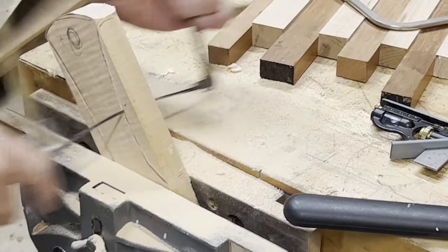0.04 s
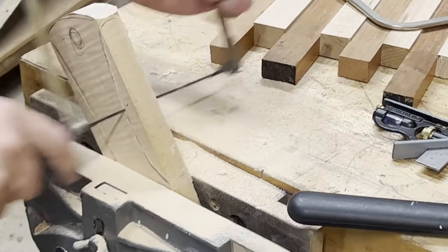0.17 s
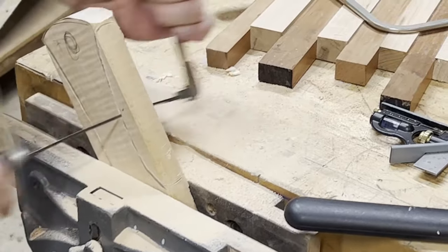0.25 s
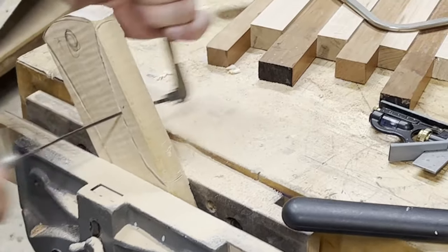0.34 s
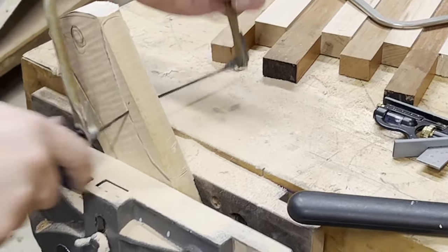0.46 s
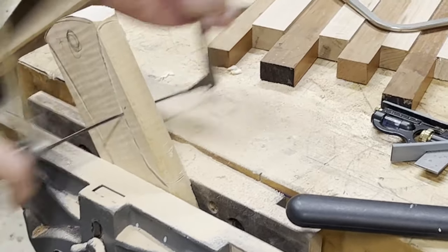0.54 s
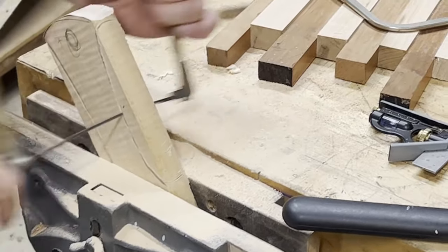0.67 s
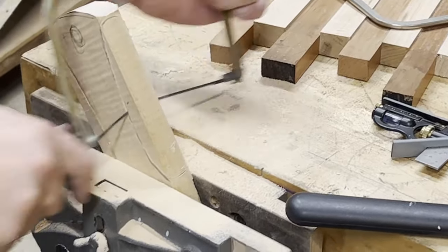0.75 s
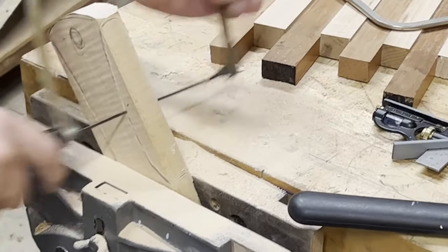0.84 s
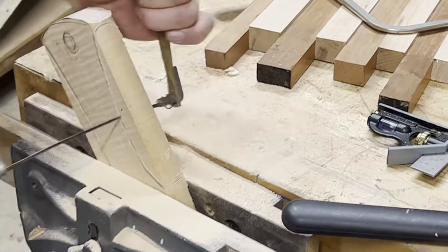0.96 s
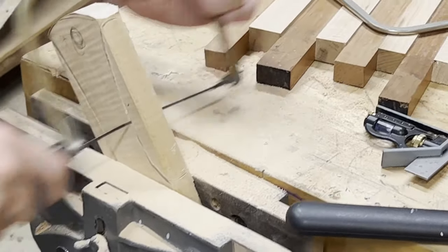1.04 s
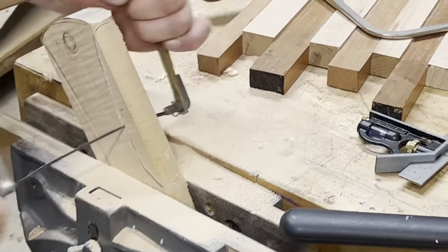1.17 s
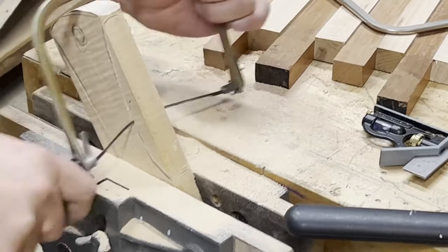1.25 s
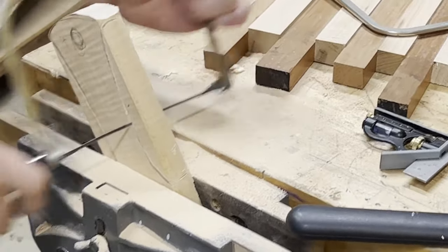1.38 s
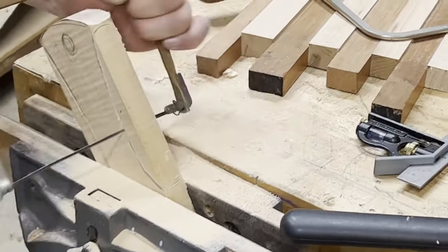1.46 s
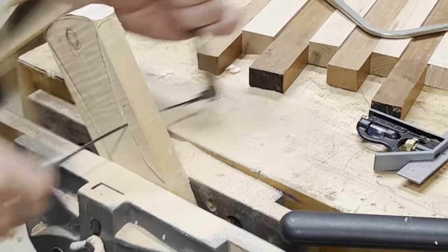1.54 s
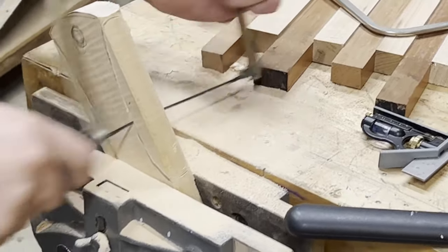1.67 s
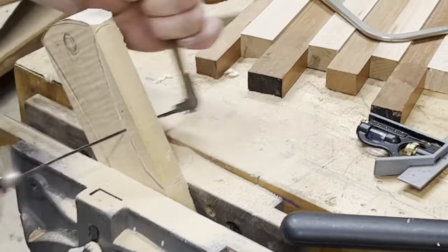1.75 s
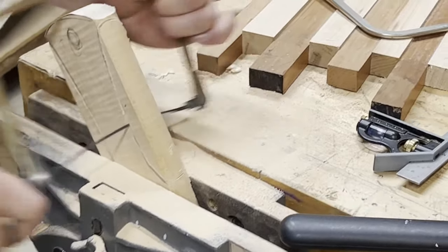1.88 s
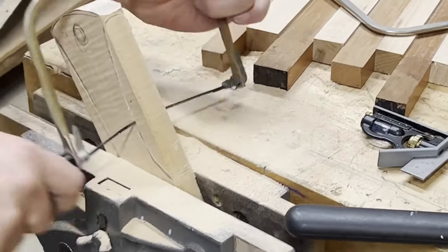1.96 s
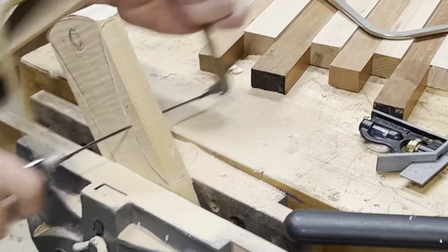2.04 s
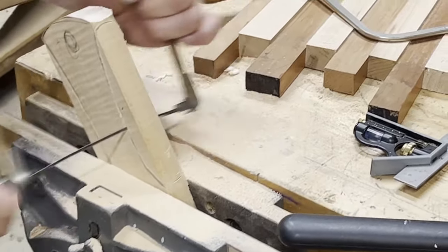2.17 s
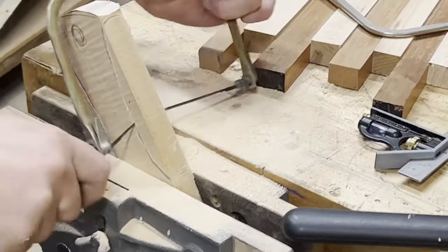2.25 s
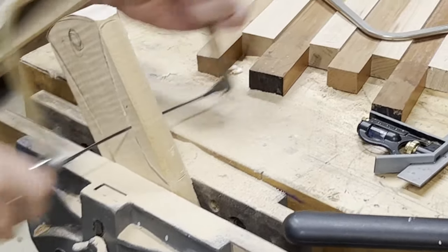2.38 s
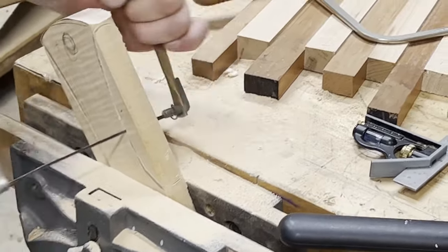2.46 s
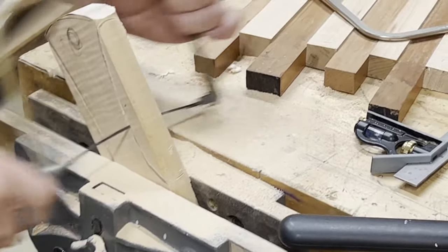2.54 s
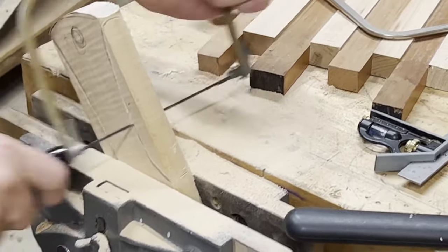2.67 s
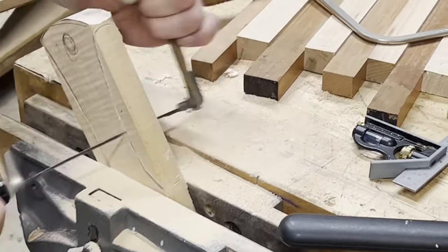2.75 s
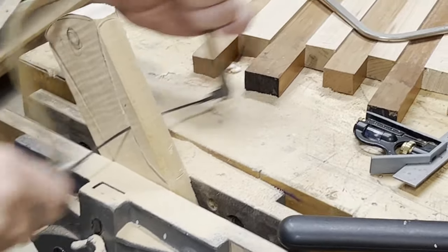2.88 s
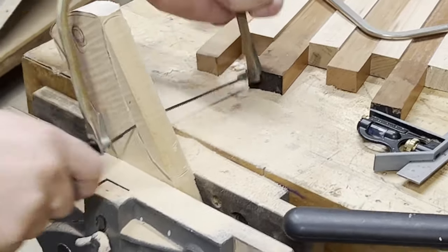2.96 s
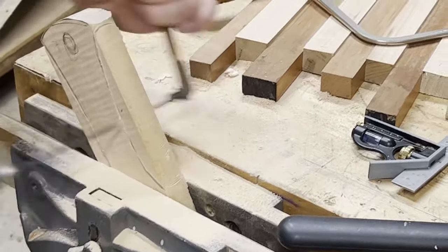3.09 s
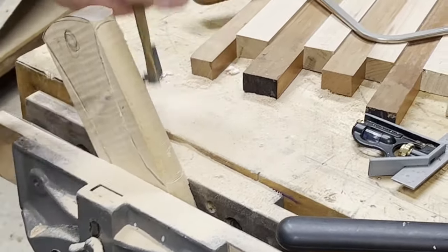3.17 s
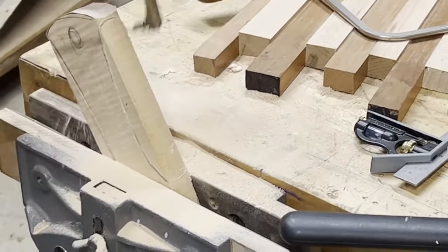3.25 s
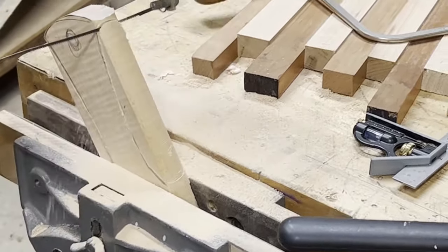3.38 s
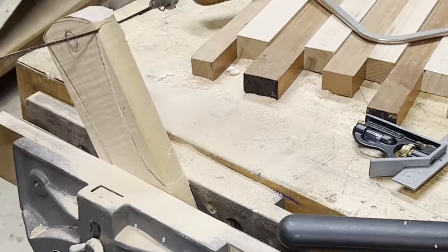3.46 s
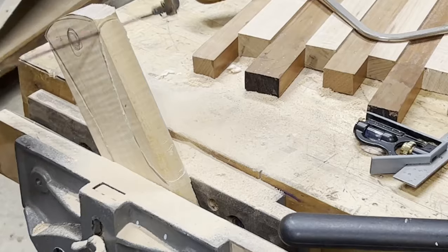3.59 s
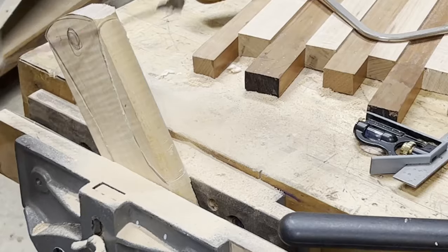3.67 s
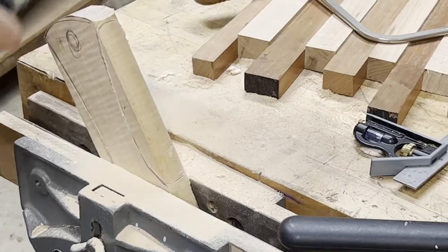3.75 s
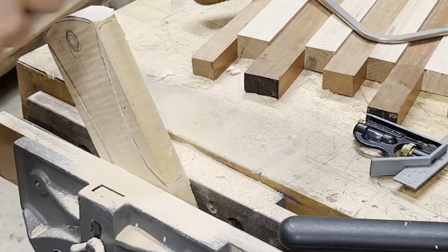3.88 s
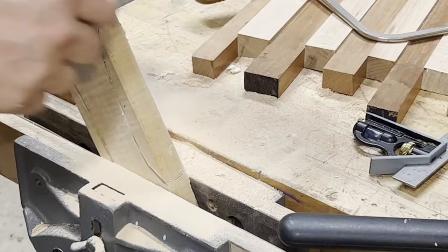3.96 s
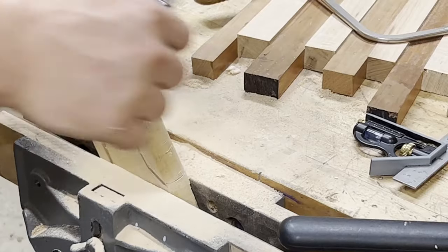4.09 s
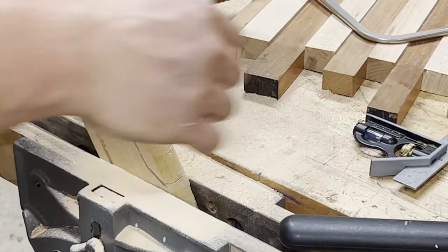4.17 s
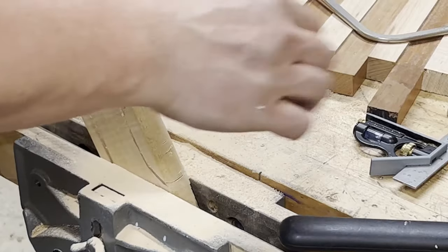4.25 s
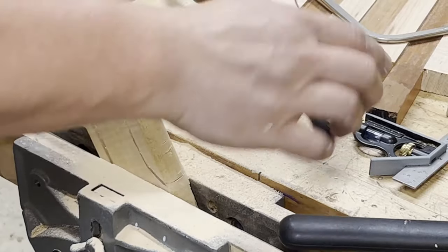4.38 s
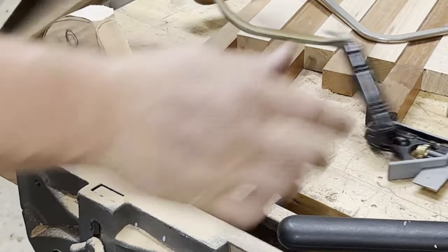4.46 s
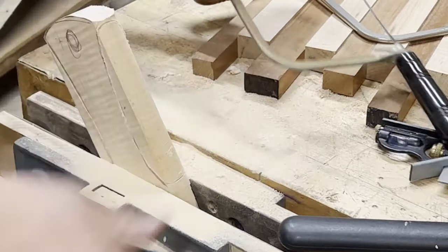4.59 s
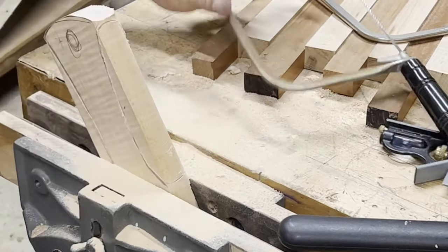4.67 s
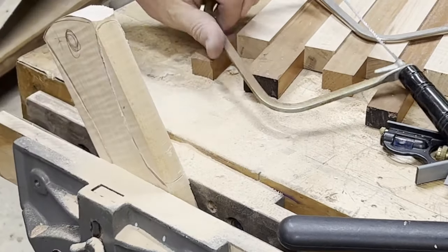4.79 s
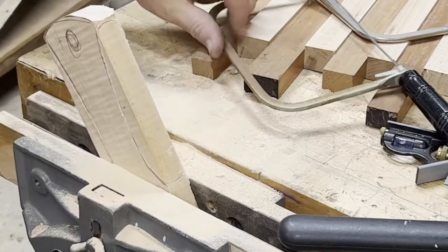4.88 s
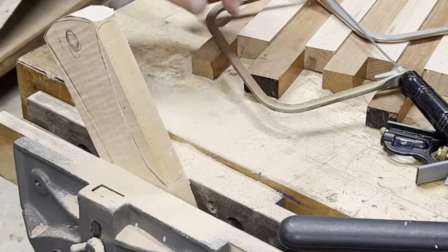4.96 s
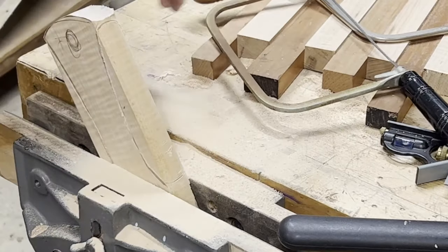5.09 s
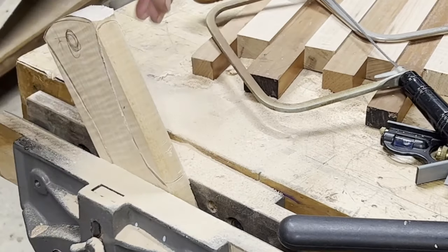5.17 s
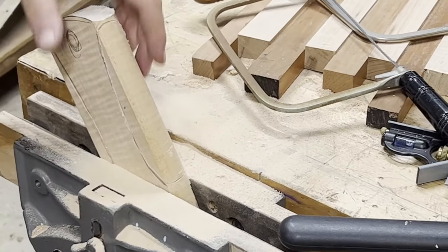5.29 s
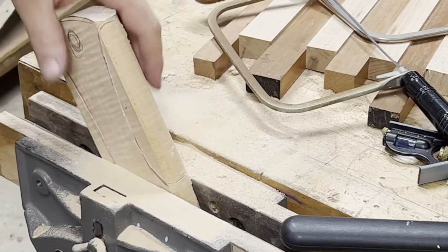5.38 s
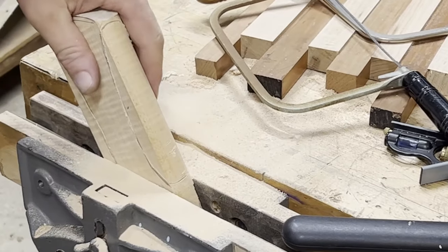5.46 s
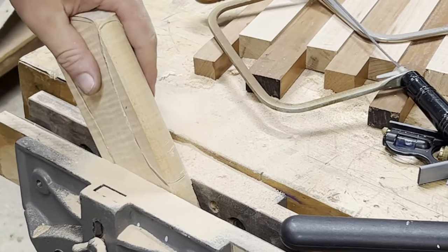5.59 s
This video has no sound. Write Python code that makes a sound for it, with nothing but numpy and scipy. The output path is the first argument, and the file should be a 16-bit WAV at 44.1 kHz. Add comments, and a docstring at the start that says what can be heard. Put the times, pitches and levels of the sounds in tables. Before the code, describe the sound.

A coping saw rasps through clamped hardwood in fast strokes, squeaking faintly, then clicks free, clatters onto the bench and slides to rest.

```python
"""Small workshop, one microphone: a coping saw cuts a curve through a hardwood board clamped in a vice.
Three strokes there and back a second: the teeth rasp, the board and the taut blade ring and the frame
shudders, all driven by noise shaped to the strokes; the blade squeaks, a thin sine, as it turns round.
The saw clicks free, clatters onto the bench (cracks of noise with ringing modes) and slides to rest in tiny
slips; a hand brushes and taps the board. Still air and a short diffuse echo surround it all."""
import sys
import numpy as np
from scipy import signal
from scipy.fft import rfft, irfft
from scipy.io import wavfile
from scipy.ndimage import uniform_filter1d

SR = 44100
rng = np.random.default_rng(int(sys.argv[2]) if len(sys.argv) > 2 else 0)


def put_to_file(sound):
    """Save the sound as 16-bit audio at rate SR, in the file named by the first command-line argument."""
    columns = np.atleast_2d(sound).T  # one column per channel
    safe = np.clip(columns, -1, 1)
    whole_steps = np.round(safe * 32767)
    wavfile.write(sys.argv[1], SR, whole_steps.astype(np.int16))


N = 248267
T = np.arange(N) / SR  # seconds

# Still air of the workshop. Each row: frequency in Hz, relative level in dB.
AIR_COLOUR = [(20, -22.5), (45, -2), (80, 3), (160, -6), (380, -9), (800, -16.5), (1700, -25.5),
              (3500, -32), (8000, -35), (16000, -38)]
AIR_DB = -60

# Cutting strokes. Each row: start in seconds, length in seconds, then the drive in dB of the rasp of the teeth,
# the board, the blade ring and the frame shudder.
CUTS = [(0.023, 0.094, -39.0, -34.5, -46, -32.0), (0.329, 0.13, -41.0, -38.5, -46.5, -32.5),
        (0.66, 0.11, -39.0, -37, -46.5, -34.5), (0.971, 0.16, -42.5, -36.0, -44, -37),
        (1.169, 0.12, -38.0, -32, -38.5, -33.5), (1.483, 0.13, -41.0, -38, -37.0, -36.5),
        (1.826, 0.13, -40.5, -37, -36.5, -38), (2.149, 0.136, -40.0, -37.5, -37.5, -37.5),
        (2.487, 0.12, -37.0, -38.5, -36.5, -40), (2.823, 0.11, -39.5, -37, -35.5, -43),
        (3.146, 0.19, -47.5, -44.5, -48.0, -41.5)]
# Light return strokes. Each row: start in seconds, length in seconds, drive in dB, frame drive in dB.
RETURNS = [(-0.048, 0.084, -56.5, -49), (0.167, 0.168, -51.5, -37.5), (0.499, 0.176, -51.5, -39.5),
           (0.819, 0.153, -51.0, -42.5), (1.349, 0.144, -50.5, -43), (1.656, 0.175, -50.0, -43),
           (2.008, 0.139, -49.5, -45.0), (2.326, 0.152, -49.5, -43.5), (2.675, 0.155, -52.5, -43),
           (2.983, 0.214, -54.5, -44), (3.449, 0.1, -63.5, -60)]
# Rasp, board and blade on the way back, in dB relative to the drive of a return stroke.
RETURN_BALANCE_DB = (0, 7, -1)
# What the twist of the blade adds to these three, in dB.
RETURN_TWIST_DB = (0, 2, 6.5)
# How rasp, board, blade and frame answer a stroke. Each row: power of the speed, growth over the stroke in dB,
# lingering share in dB, its t60 in seconds.
RESPONSE = [(1.05, 6, -12, .5), (0.77, 8, -3.5, .41), (0.87, -0.5, -7, 0.37), (1.14, 2.5, -3, 0.47)]
# The teeth bite deep and stall, shaking blade, board and frame in turn. Each row: time in seconds, then the
# drive in dB of blade, board and frame.
BITES = [(0.729, -36.5, -30.5, -42), (1.245, -25.5, -25, -28.5), (1.9, -35.5, -38, -27.5),
         (2.568, -24, -20, -26), (2.866, -33, -32.5, -50)]
BITE_WIDTH_S, BITE_LAG_S = 0.011, 0.0099
# Just after top speed the teeth outrun the frame's resonance and its shudder dips. One row: place in the
# stroke from 0 to 1, width in seconds, depth in dB.
OUTRUN = (0.58, .012, -8)
FRAME_PUSH_DB = 4  # extra shudder at mid-stroke, as the teeth pass through that resonance
# The slack frame wobbles as the saw is backed out of the cut. One row: start in seconds, length in seconds,
# drive in dB.
BACKING_OUT = (3.29, 0.12, -41.5)
BEND_S, BEND_TAKES_S = 1.06, 0.028  # the blade twists into the bend

# Rasp of the teeth in the straight cut and in the bend. Each row: frequency in Hz, relative level in dB.
RASP_STRAIGHT = [(1800, -25.5), (2850, -1.5), (3370, -10), (4100, -4.5), (4740, -9), (5150, -13.5),
                 (5900, -5), (7830, -9), (9900, -19.5), (11000, -7), (13300, -20), (14700, -11),
                 (15600, -23), (16200, -58)]
RASP_BEND = [(1800, -30.5), (2800, -7.5), (3650, -5.5), (5150, -12), (5800, -12), (6430, 0), (7400, -13.5),
             (8500, -12), (9690, -15.5), (11700, -13), (12900, -16), (14500, -10), (15600, -15.5),
             (16200, -47.5)]
# Resonances of the saw frame, the clamped board and the blade, in the straight cut and in the bend.
# Each row: frequency in Hz, width of a single pass in Hz, relative level in dB.
BODY_STRAIGHT = [(305.3, 13, -2), (362, 55, -1), (430.6, 23, 2), (486.5, 66, -8), (624, 76, -1.5),
                 (697, 63, -6), (820, 83, -2.5), (858, 83, -6), (1049, 55, -1), (1143, 130, -5),
                 (1286, 130, -4.5), (1414, 28, -4), (1607, 230, -7.5), (1822, 140, -11), (2250, 130, -13.5),
                 (2423, 140, -17), (2905, 210, -15), (3674, 200, -14.5)]
BODY_BEND = [(290.5, 10, 4.5), (352, 82.5, 5), (438.8, 17, -5.5), (570.4, 23, -4), (739, 51, -3),
             (788, 80, 0), (894, 33, -0.5), (1030, 63, -2.5), (1143, 121, -6), (1340, 123, -6.5),
             (1480, 91, -6.5), (1620, 110, -14), (2090, 280, -14), (2333, 72, -1), (2478, 120, -2),
             (2600, 54, -9.5), (2780, 61, -9), (2940, 68, -12.5), (3234, 270, -19.5), (3624, 130, -16)]
# Rumble of the bench under the strokes. Each row: frequency in Hz, relative level in dB.
BENCH_COLOUR = [(30, -23), (55, -4.5), (100, 5.5), (135, -4.5), (158, 10.5), (185, 2), (225, -3), (270, 7),
                (400, -32)]

# The blade catches and jolts the board, hardest on the way back. Each row: time in seconds, peak in dB.
CATCHES = [(.04, -35), (.223, -22.5), (.555, -23), (.889, -23.5), (1.081, -27), (1.173, -29.5),
           (1.407, -21), (1.624, -27), (1.734, -24), (1.851, -27.5), (2.065, -20), (2.283, -29),
           (2.397, -21.5), (2.726, -22.5), (2.941, -30), (3.055, -22), (3.159, -28)]
# The board rattling in the vice. Each row: frequency in Hz, relative level in dB.
CATCH_COLOUR = [(70, -31.5), (160, 10), (250, -7), (350, -12.5), (470, -18), (580, 8), (670, -5), (810, 9),
                (1050, -7.5), (1300, -15.5), (1900, -10.5), (3000, -34), (6000, -36.5), (16000, -59)]

# The steel blade clicks in the cut and as it comes free. Each row: time in seconds, approximate peak in dB,
# treble gain in dB.
CLICKS = [(.04, -34, 10), (3.307, -30.5, -16), (3.457, -40.5, -8), (3.502, -37, -23), (3.517, -37.5, -21.5),
          (3.605, -22.5, -3.5), (3.675, -30, -3.5), (3.689, -15.5, -4), (3.7005, -10.5, 6.5),
          (3.884, -45, -2), (3.944, -50.5, -6), (4.235, -68, -8)]
# Crack of a click. Each row: frequency in Hz, relative level in dB.
CLICK_COLOUR = [(120, -56.5), (200, -8), (382, 6), (689, -23.5), (1390, -6.5), (1730, -20.5), (2250, 7),
                (2650, -9), (2960, -6), (7600, -8.5), (8970, -8.5), (12300, -11), (14500, -2), (16500, -31)]
# Ringing of the steel. Each row: frequency in Hz, relative level in dB, undamped t60 in seconds.
CLICK_MODES = [(356, 5, 0.25), (935, -3, 0.52), (1470, -7.5, 0.38), (2350, -4, 0.34), (2950, -1, 0.72),
               (3315, -3, 0.24), (4240, 3, 0.32), (4970, -11.5, 0.29), (6099, -8, 0.65), (7058, -23, 0.24),
               (8930, 1, 0.35), (10380, -29.5, 0.36), (10710, -11.5, 0.21), (10800, -21.5, 0.91),
               (11680, -5, 0.11), (12870, -34.5, 0.45), (13400, -22.5, 0.29), (14610, -20.5, 0.74),
               (14770, -12.5, 0.15), (15430, -23, 0.15)]
LONGEST_RING_S = .24  # the bench and the hand damp every struck mode to this t60 at most

# The blade squeaks at a turn. Each row: time in seconds, level in dB, seconds until it is let go.
SQUEAKS = [(.286, -47, .025), (.957, -56, .012), (1.469, -52, .008), (1.764, -51, .02), (2.125, -40, .025),
           (2.433, -46, .022), (2.806, -41, .02)]
SQUEAK_HZ = 11065

# Light knocks on wood. Each row: time in seconds, approximate peak in dB, treble gain in dB.
KNOCKS = [(3.503, -32, 2), (3.561, -37.5, -13), (3.606, -28.5, -21), (3.619, -27, -16), (3.708, -24, -7),
          (4.8228, -25.5, 22), (4.868, -24.5, 15), (4.878, -20.5, -14), (4.897, -19, 10), (4.918, -25, 24),
          (4.959, -24.5, 6), (4.992, -27.5, 15), (5.315, -37, 13), (5.395, -35, -45), (5.475, -43.5, 23)]
# Bench top, knocked or slid over. Each row: frequency in Hz, relative level in dB.
BENCH_TOP_COLOUR = [(47, -14.5), (80, -1), (208, -6), (277, 9.5), (386, -5), (657, 6.5), (1370, -3.5),
                    (1490, 1), (1860, -5.5), (4050, -20.5), (5400, -29), (8990, -33.5), (9610, -35),
                    (10700, -25.5), (16000, -45)]

# Single tones of the steel frame that sing out. Each row: time in seconds, frequency in Hz, peak in dB,
# t60 in seconds.
PINGS = [(3.606, 2280, -40, 0.14), (3.701, 9150, -36.5, 0.26), (3.985, 2280, -60, 0.095),
         (4.236, 2250, -54.5, 0.046), (4.245, 4750, -69, .1), (4.4, 1144, -26, .081),
         (4.489, 1597, -20.5, 0.055), (4.49, 6670, -26.5, 0.051), (4.534, 5030, -36, 0.041),
         (4.69, 4980, -49, 0.04)]

# The saw lands on the bench and bounces. Each row: time in seconds, approximate peak in dB, treble gain in dB.
BOUNCES = [(4.3988, -16, -4), (4.408, -14, 17.5), (4.412, -20, 4), (4.458, -15.5, 24), (4.481, -17.5, 5),
           (4.489, -18, 7), (4.534, -19, -3.5), (4.561, -24, -1), (4.626, -30.5, -26), (4.689, -33.5, -23)]
# Crack of a landing. Each row: frequency in Hz, relative level in dB.
BOUNCE_COLOUR = [(88, -31), (150, 4.5), (218, -27.5), (349, 1), (549, -9), (1050, 0), (1330, -3.5),
                 (1560, -5), (3630, -20.5), (5070, -20.5), (8290, -17), (9510, -28.5), (10900, -14),
                 (15600, -34), (16500, -44)]
# Ringing of the landed saw. Each row: frequency in Hz, relative level in dB, undamped t60 in seconds.
BOUNCE_MODES = [(1072, 19.5, 1.2), (1134, 10, 0.99), (1640, 5, 0.19), (4247, -27, 1.1), (4690, 6.5, 0.13),
                (5000, -10, 0.47), (5500, -14, 0.21), (6078, -17, 0.31), (6578, -8, 0.36),
                (7187, -17, 0.41), (7530, -9, 0.27), (8250, -18, 0.38), (9249, -21, 0.34),
                (10090, -21, 0.36), (10470, -16, 0.21), (11060, -8.5, 0.16), (11500, -18, 0.23),
                (12440, -22, 0.38), (13040, -19, 0.3), (13440, -22, 0.3)]

# The hand slips off the saw and takes hold of the board. Each row: start in seconds, length in seconds,
# level in dB.
BRUSHES = [(4.772, 0.066, -58.5), (5.011, .11, -55.5), (5.05, 0.28, -66.5), (5.476, 0.22, -67)]

SLIDE_S, SLIDE_DB = 4.82, -34  # the saw starts to skid over the bench
SLIDE_RISE_S, SLIDE_HOLD_S, SLIDE_T60_S = 0.053, 0.14, 0.41  # rise and hold both count from the start

TOP_HZ = 16300  # upper limit of the sound in Hz


def amp(db):
    """Decibels to gain."""
    return 10 ** (np.asarray(db) / 20)


def unit(x):
    """Scale to rms 1."""
    return x / np.sqrt(np.mean(x ** 2))


def fade(t, t60):
    """A decay of 60 dB in t60 seconds."""
    return np.exp(-np.log(1000) * t / t60)


def add(out, s, sound):
    """Mix a sound in at time s."""
    i = int(s * SR)
    out[i:i + len(sound)] += sound[:N - i]


def colour(x, points, size=4096):
    """Causal minimum-phase filter through (Hz, dB) points, made by folding the cepstrum."""
    hz, db = np.transpose(points)
    f = np.maximum(np.fft.rfftfreq(size, 1 / SR), 1)
    cepstrum = irfft(np.log(amp(np.interp(np.log(f), np.log(hz), db))))
    cepstrum[1:size // 2] *= 2
    cepstrum[size // 2 + 1:] = 0
    response = irfft(np.exp(rfft(cepstrum)))
    return signal.fftconvolve(x, response)[:len(x)]


def band(x, lo_hz, hi_hz, order=2):
    """Band-pass."""
    return signal.sosfilt(signal.butter(order, [lo_hz, hi_hz], "band", fs=SR, output="sos"), x)


def resonate(x, peaks):
    """Parallel resonances (Hz, width Hz, dB), each applied twice so that the valleys stay dark."""
    out = 0
    for hz, width, db in peaks:
        section = np.concatenate(signal.iirpeak(hz, hz / width, SR))
        out = out + amp(db) * signal.sosfilt([section] * 2, x)
    return out


def waver(rate):
    """Smooth chance with rms 1, taking about `rate` new values a second."""
    k = int(SR / rate)
    values = np.repeat(rng.standard_normal(N // 8), 8)
    steps = values[np.arange(N) // k * 8]
    return unit(uniform_filter1d(steps, k))


def grains(rate, spread_db):
    """Random tiny impacts of uneven size, `rate` a second on average."""
    happens = rng.random(N) < rate / SR
    sign = rng.choice([-1, 1], N)
    size = amp(spread_db * np.minimum(rng.exponential(size=N), 4))
    return unit(happens * sign * size)


def steady(x, size, give=0.39):
    """Even out swells slower than `size` samples and keep the fine grain."""
    swell = np.sqrt(abs(uniform_filter1d(x ** 2, size)))
    return unit(x / (swell + give * x.std()))


def spread(x, tail, db):
    """Convolve with a tail scaled to unit energy, at a level in dB."""
    return amp(db) * signal.fftconvolve(x, tail / np.sqrt(np.sum(tail ** 2)))[:N]


def scatter(x, share_db, t60):
    """Dense short ringing of steel and nearby surfaces, added to the sound."""
    t = T[:SR // 8]
    return x + spread(x, rng.standard_normal(len(t)) * fade(t, t60), share_db)


def glide(x, stretch):
    """Shift all resonances by a moving ratio, by reading the sound at a varying speed."""
    return np.interp(np.cumsum(stretch) / SR, T, x)


def arch(start, length, power=1, growth_db=0):
    """One sweep of the arm: speed rises and falls as half a sine while the pressure grows."""
    u = np.clip((T - start) / length, 0, 1)
    speed = np.maximum(np.sin(np.pi * u), 0)
    return speed ** power * amp(growth_db * (u - .5)) * (u > 0) * (u < 1)


def bell(s, width):
    """A smooth bump around time s."""
    return np.exp(-.5 * ((T - s) / width) ** 2)


def still_air():
    """Quiet coloured noise of the workshop air, wavering slightly."""
    return amp(AIR_DB) * unit(colour(rng.standard_normal(N), AIR_COLOUR)) * amp(0.38 * waver(15))


def twist(t):
    """0 in the straight cut, 1 in the bend."""
    return np.clip((t - BEND_S) / BEND_TAKES_S, 0, 1)


def linger(gain, share_db, t60):
    """A share of the energy hangs on in the vice, bench and room."""
    keep = fade(1 / SR, t60) ** 2
    held = signal.lfilter([1 - keep], [1, -keep], gain ** 2)
    return np.sqrt(gain ** 2 + amp(share_db) ** 2 * held)


def effort():
    """How hard the strokes and bites drive rasp, board, blade and frame."""
    strokes = list(CUTS)
    for start, length, db, frame_db in RETURNS:
        levels = db + np.array(RETURN_BALANCE_DB) + twist(start) * np.array(RETURN_TWIST_DB)
        strokes.append((start, length, *levels, frame_db))
    drives = []
    for k, (power, growth_db, _, _) in enumerate(RESPONSE):
        drives.append(sum(amp(levels[k]) * arch(start, length, power, growth_db)
                          for start, length, *levels in strokes))
    rasp, board, blade, frame = drives
    place, width, depth_db = OUTRUN
    for start, length, *_ in CUTS:
        dip = depth_db * bell(start + place * length, width)
        frame = frame * amp(FRAME_PUSH_DB * arch(start, length) + dip)
    start, length, db = BACKING_OUT
    frame = frame + amp(db) * arch(start, length)
    for s, blade_db, board_db, frame_db in BITES:
        blade = np.hypot(blade, amp(blade_db) * bell(s, BITE_WIDTH_S))
        board = np.hypot(board, amp(board_db) * bell(s + BITE_LAG_S, BITE_WIDTH_S))
        frame = np.hypot(frame, amp(frame_db) * bell(s + 2 * BITE_LAG_S, BITE_WIDTH_S))
    return [linger(drive, share_db, t60)
            for drive, (_, _, share_db, t60) in zip((rasp, board, blade, frame), RESPONSE)]


def teeth(rate, jitter, scatter_db, chip):
    """Each tooth strikes the wood and tears fibres until the next arrives; returns blows and tearing."""
    phase = np.cumsum(rate * np.exp(jitter * waver(500))) / SR
    tooth = phase.astype(int)
    size = amp(scatter_db * rng.standard_normal(N))[tooth]
    blows = np.diff(tooth, prepend=0) * size / np.sqrt(rate)
    # chip: decay of the tearing, as a fraction of the gap between teeth
    tearing = grains(14000, 2.35) * size * np.exp(-(phase % 1) / chip)
    return unit(blows), unit(tearing)


def torn_fibres(tearing, hiss, effort_share, bright=.1, bright_db=3):
    """The rasp itself: coloured tearing whose top end grows with the effort."""
    fibres = colour(scatter(tearing, share_db=1, t60=0.024), hiss)
    fibres = fibres / band(fibres, 3500, 10500).std()
    top = signal.sosfiltfilt(signal.butter(4, 10500, "high", fs=SR, output="sos"), fibres)
    return fibres + top * (amp(bright_db) * effort_share ** bright - 1)


def bench_rumble(frame, bend):
    """The heavy bench evens out the strokes and rumbles under them, a little louder in the bend."""
    load = unit(uniform_filter1d(np.sqrt(frame), size=4000))
    return amp(-49 + 2 * bend) * load * steady(colour(grains(900, 5.3), BENCH_COLOUR), size=3000)


def sawing():
    """Teeth drive the board, blade and frame; a faster stroke is louder, brighter, with more teeth a second."""
    rasp, board, blade, frame = effort()
    effort_share = rasp / rasp.max()
    speed = np.clip(effort_share ** .4, .15, 1)
    blows, tearing = teeth(1000 * speed, jitter=.14, scatter_db=1.0, chip=0.47)  # teeth a second
    force = 0.4 * blows + tearing
    # the blade runs from -1 to 1 and back in each stroke, which retunes the frame
    starts = [cut[0] for cut in CUTS]
    stroke = np.interp(T, starts, np.arange(len(starts)))
    travel = -np.cos(2 * np.pi * stroke) * (T < starts[-1])
    # hard and soft layers of the wood make each stroke chatter
    chatter = amp(1.97 * waver(110))
    lumps = unit(amp(3.5 * waver(45)))
    # the timbre changes as the blade twists into the bend
    bend = twist(T)
    straight_cut = (1 - bend, RASP_STRAIGHT, BODY_STRAIGHT, 0.0837)
    bend_cut = (bend, RASP_BEND, BODY_BEND, 0.016)
    out = np.zeros(N)
    for share, hiss, body, retune in (straight_cut, bend_cut):
        fibres = torn_fibres(tearing, hiss, effort_share)
        ringing = glide(resonate(force, body), 1 + 0.3065 * retune * travel)
        board_ring = steady(band(ringing, 513, 1880, order=3), size=700)
        blade_ring = steady(band(ringing, 2080, 3540, order=3), size=700)
        # the frame shudders in slower, uneven slips
        shudder = glide(resonate(grains(1500, 1.0), body), 1 + retune * travel)
        shudder = band(steady(band(shudder, 293.6, 535, order=4), size=700), 270, 620)
        out += share * chatter * amp(-1) * rasp * fibres
        out += share * chatter * amp(-2) * board * board_ring
        out += share * chatter * amp(-0.5) * blade * blade_ring
        out += share * lumps * amp(0.5) * frame * shudder
    # a hard bite tears the wood with an extra harsh crunch
    crunch = unit(band(force, 2650, 4060, order=3))
    out += amp(-7) * blade * (blade / blade.max()) ** 0.95 * crunch
    return out + bench_rumble(frame, bend)


def catches(snap_t60=0.0095, rattle_db=-5, rattle_t60=0.079):
    """A tooth snags and snaps free: the board rattles briefly in the vice."""
    out, t = np.zeros(N), T[:SR // 6]
    for s, db in CATCHES:
        rattle = steady(colour(rng.standard_normal(len(t)), CATCH_COLOUR), size=130)
        decay = fade(t, snap_t60) + amp(rattle_db) * fade(t, rattle_t60)
        jolt = rattle * decay * np.minimum(t * 2000, 1)  # rises in half a millisecond
        add(out, s, amp(db) * jolt / abs(jolt).max())
    return out


def strikes(rows, points, modes, crack_t60, body_t60, body_db, ring_db, treble_hz, split=0.0072):
    """Blows: a sharp crack, the short rattle of the struck body, and close pairs of modes that ring on."""
    out, t = np.zeros(N), T[:SR // 2]
    onset = SR // 250  # first 4 ms
    crest = 2 * np.sqrt(2)  # assumed peak over rms in the onset
    for s, db, treble_db in rows:
        noise = steady(colour(rng.standard_normal(len(t)), points), size=180)
        crack = noise * (fade(t, crack_t60) + amp(body_db) * fade(t, body_t60))
        ring = 0
        for hz, level, t60 in modes:
            decay = amp(level) * fade(t, min(t60, LONGEST_RING_S))
            for detune in (0, split * rng.standard_normal()):
                ring = ring + decay * np.sin(2 * np.pi * (hz * (1 + detune) * t + rng.random()))
        hit = crack / crack[:onset].std() + amp(ring_db) * ring
        dull = signal.sosfilt(signal.butter(1, treble_hz, fs=SR, output="sos"), hit)
        hit = dull + amp(treble_db) * (hit - dull)
        add(out, s, amp(db) * hit / (crest * hit[:onset].std()))
    return out


def clicks():
    """The steel blade clicks in the cut and as it comes free, and its modes ring."""
    return strikes(CLICKS, CLICK_COLOUR, CLICK_MODES, crack_t60=0.034, body_t60=0.41,
                   body_db=-21.0, ring_db=-25.5, treble_hz=3900)


def squeaks(t60=0.11, rise=0.0024, wobble=0.002):
    """The blade sticks and sings one thin high note, then rings out."""
    loudness = np.zeros(N)
    for s, db, held in SQUEAKS:
        add(loudness, s, amp(db) * np.minimum(T / rise, 1) * fade(np.maximum(T - held, 0), t60))
    hz = SQUEAK_HZ * (1 + wobble * waver(150))
    note = unit(np.sin(2 * np.pi * np.cumsum(hz) / SR))
    return loudness * note * amp(1.18 * waver(120))


def knocks():
    """Light knocks on wood; the narrower a resonance of the body, the longer it rings."""
    wood = [(hz, db, np.log(1000) / (np.pi * width)) for hz, width, db in BODY_STRAIGHT]
    return strikes(KNOCKS, BENCH_TOP_COLOUR, wood, crack_t60=0.022, body_t60=0.21,
                   body_db=-0.5, ring_db=-16.5, treble_hz=2540)


def pings():
    """One mode of the frame rings on after a jog."""
    out, t = np.zeros(N), T[:SR // 2]
    for s, hz, db, t60 in PINGS:
        add(out, s, amp(db) * np.sin(2 * np.pi * hz * t) * fade(t, t60))
    return out


def bounces():
    """The saw lands on the bench and bounces: cracks with the modes of the saw ringing."""
    return strikes(BOUNCES, BOUNCE_COLOUR, BOUNCE_MODES, crack_t60=0.029, body_t60=0.19,
                   body_db=-9.5, ring_db=-33.5, treble_hz=3430)


def brush():
    """Skin over dusty wood: a faint fine hiss."""
    rub = sum(amp(db) * arch(start, length) for start, length, db in BRUSHES)
    skin = [(500, -5), (1500, 4.5), (4500, 1.5), (8000, -1), (12000, -7.5), (16000, -14.5)]  # (Hz, dB)
    return rub * unit(colour(grains(9000, 2.5), skin))


def skid():
    """The skid gathers, holds and dies away."""
    t = np.maximum(T - SLIDE_S, 0)
    rise = np.sqrt(np.minimum(t / SLIDE_RISE_S, 1))
    return amp(SLIDE_DB) * rise * fade(np.maximum(t - SLIDE_HOLD_S, 0), SLIDE_T60_S)


def slide(ring_db=-2, grit_db=-17):
    """The saw skids over the dusty bench in tiny slips that ring its frame; crumbs tick under it."""
    slips = grains(1500, 1.8)
    frame = [(290, 35, -6), (690, 110, 10), (1124, 130, 16.5), (1550, 35, 17.5), (1620, 90, -16)]
    ring = resonate(slips, frame)
    grit = band(scatter(grains(175, 11.0), share_db=10, t60=0.025), 1500, 14000)
    scrape = unit(colour(slips, BENCH_TOP_COLOUR))
    return skid() * unit(scrape + amp(ring_db) * unit(ring) + amp(grit_db) * unit(grit))


def workshop(x, wet_db, gap=0.011):
    """Diffuse echo of a small room, after a short gap in seconds; the treble dies first."""
    t = T[:SR]
    noise = rng.standard_normal(SR) * (t > gap)
    # each band: low edge in Hz, high edge in Hz, t60 in seconds
    bands = [(48.4, 725, 0.72), (765, 2020, 0.41), (2920, 8100, 0.31), (7900, SR / 2 - 1, 0.17)]
    tail = sum(band(noise, lo, hi) * fade(t, t60) for lo, hi, t60 in bands)
    return spread(x, tail, wet_db)


def scene():
    """Saw, bench and room at one microphone; the handling gets more of the room than the cut."""
    air = still_air()
    cut = sawing() + catches() + squeaks()
    tools = clicks() + knocks() + pings() + bounces() + brush() + slide()
    echo = workshop(cut, wet_db=-24.5) + workshop(tools, wet_db=-16)
    return (cut + tools + echo + air)[None]


def record(dry):
    """Steep low-pass: nothing sounds above TOP_HZ."""
    return signal.sosfilt(signal.ellip(10, .2, 70, TOP_HZ, fs=SR, output="sos"), dry)


dry = scene()
out = record(dry)
put_to_file(out)
```